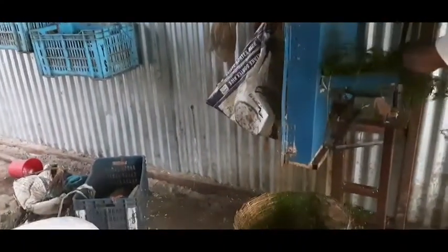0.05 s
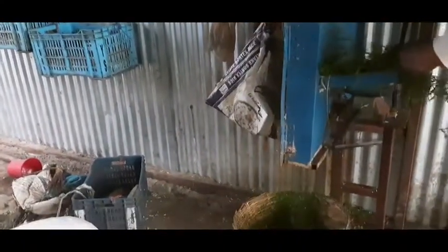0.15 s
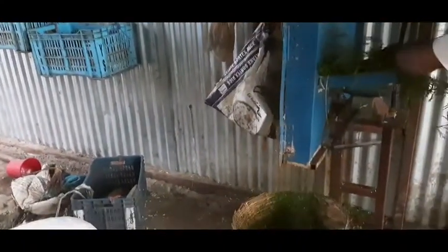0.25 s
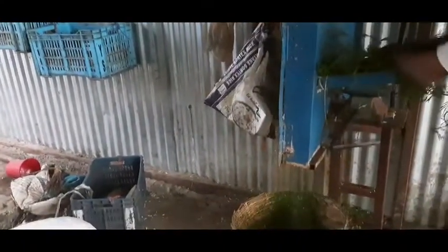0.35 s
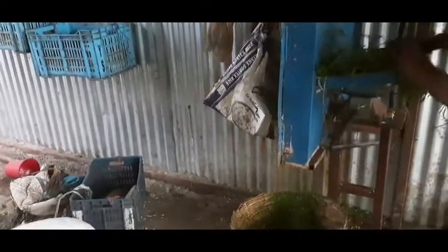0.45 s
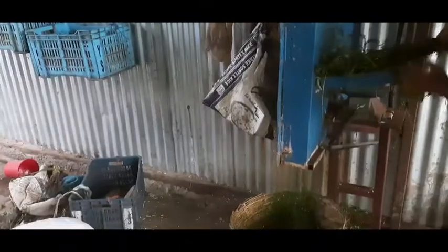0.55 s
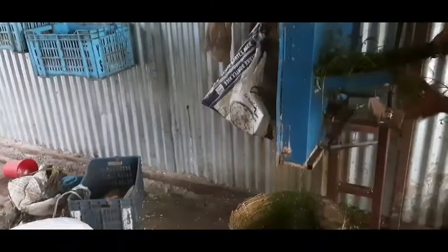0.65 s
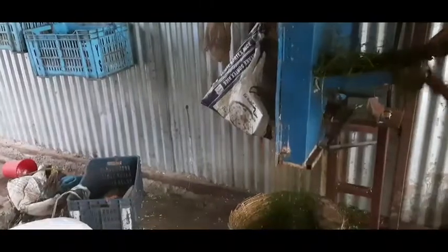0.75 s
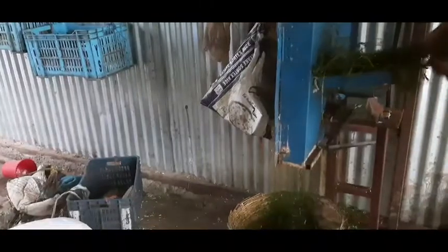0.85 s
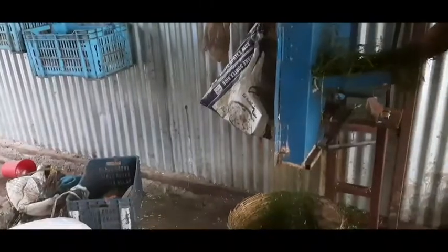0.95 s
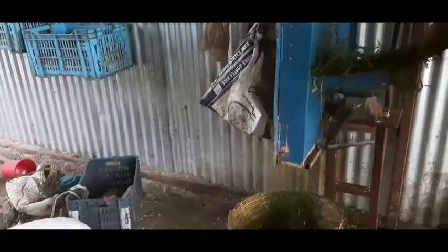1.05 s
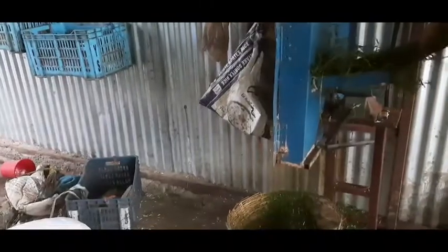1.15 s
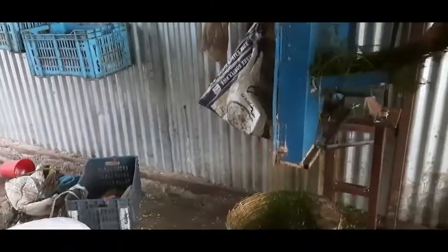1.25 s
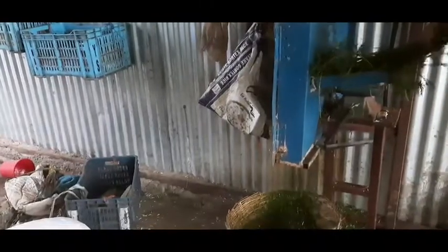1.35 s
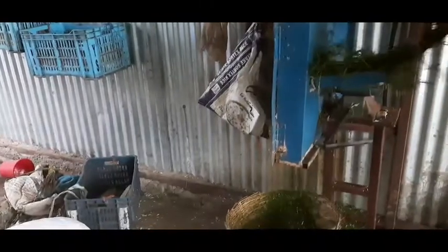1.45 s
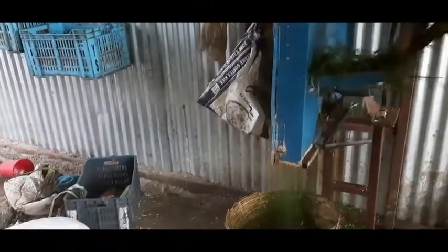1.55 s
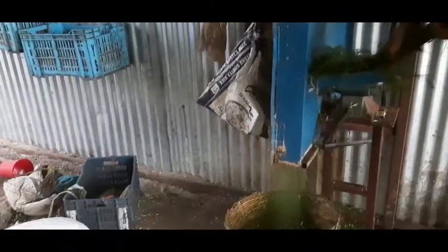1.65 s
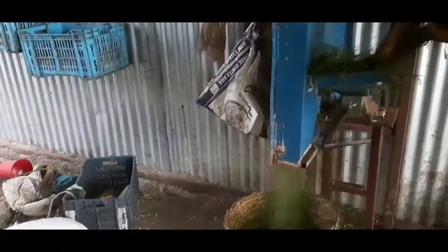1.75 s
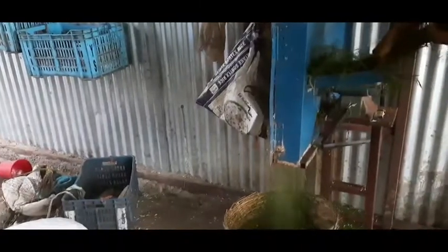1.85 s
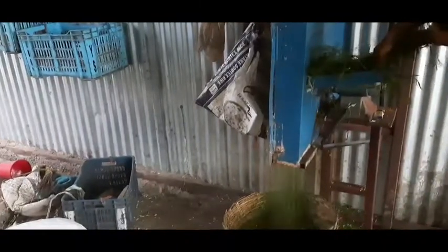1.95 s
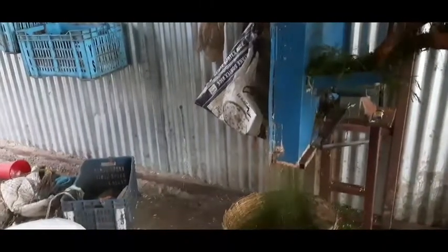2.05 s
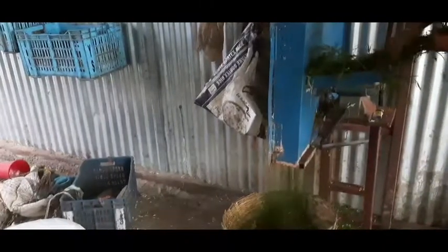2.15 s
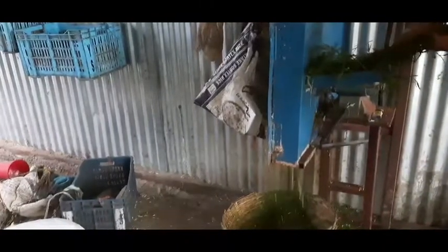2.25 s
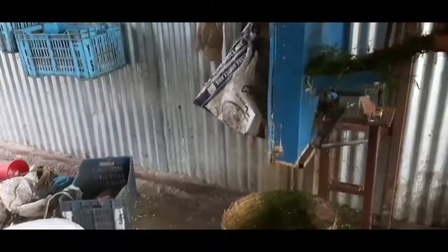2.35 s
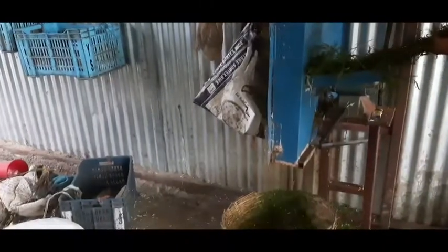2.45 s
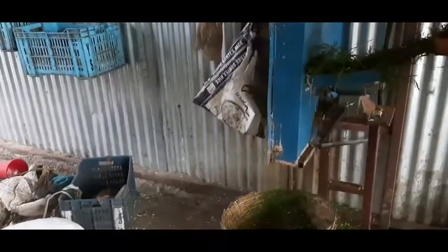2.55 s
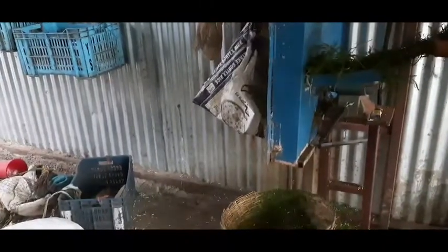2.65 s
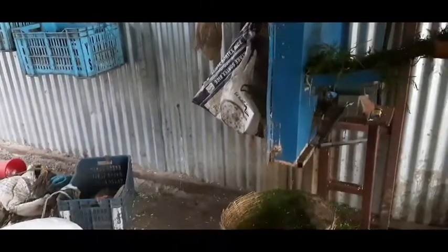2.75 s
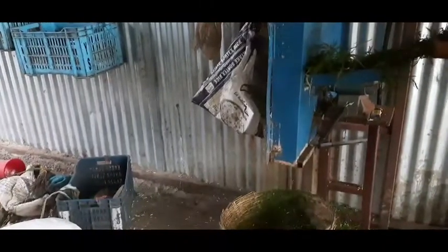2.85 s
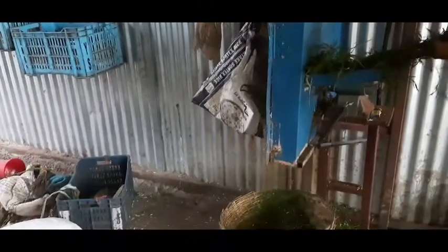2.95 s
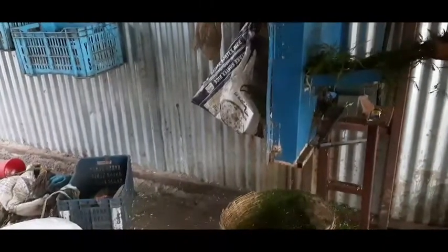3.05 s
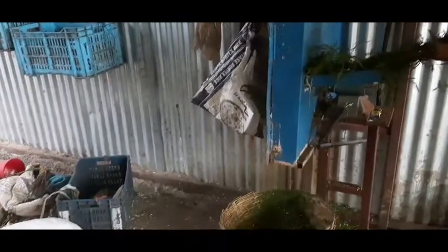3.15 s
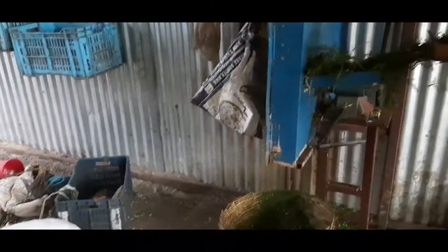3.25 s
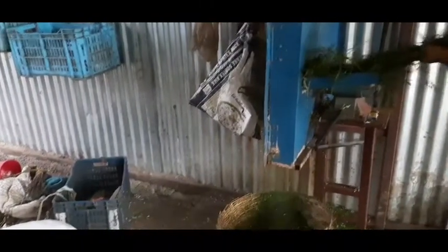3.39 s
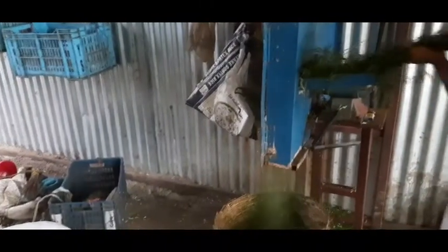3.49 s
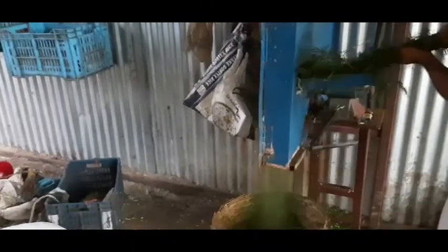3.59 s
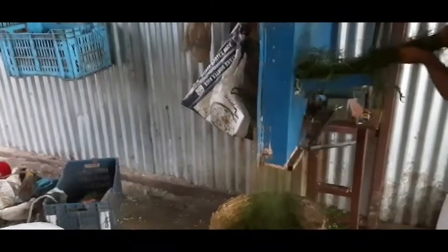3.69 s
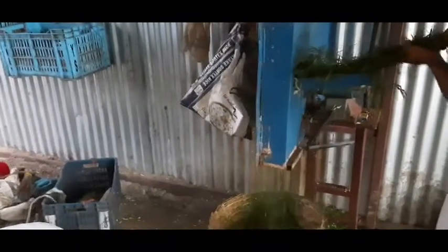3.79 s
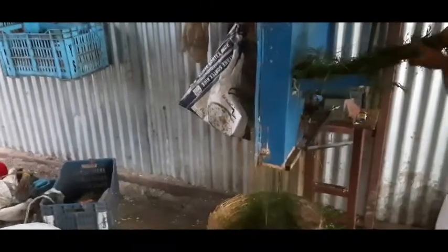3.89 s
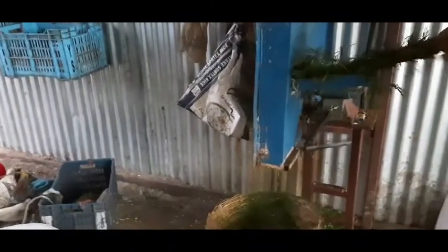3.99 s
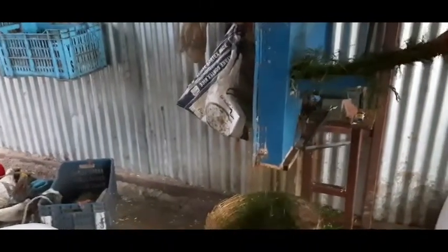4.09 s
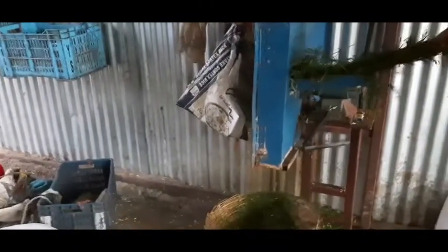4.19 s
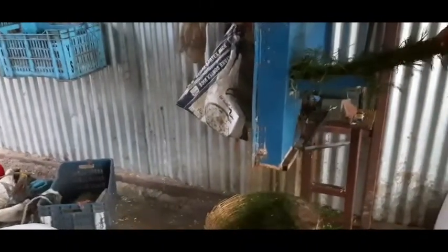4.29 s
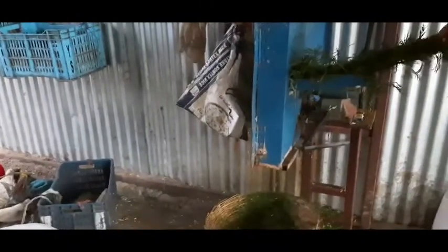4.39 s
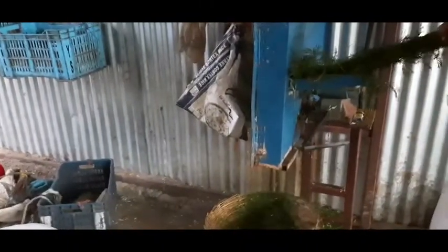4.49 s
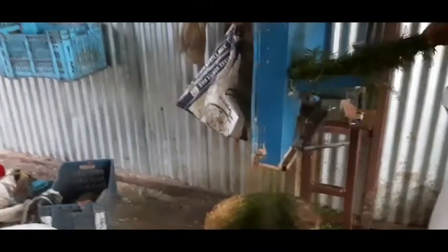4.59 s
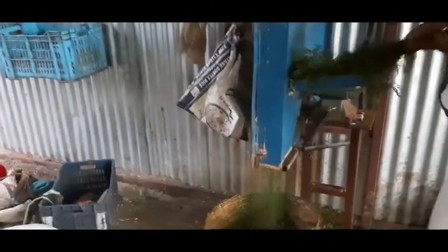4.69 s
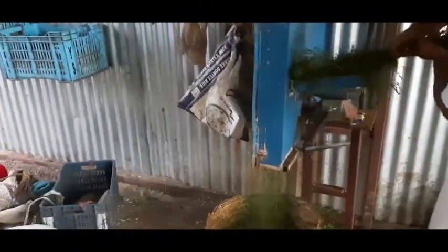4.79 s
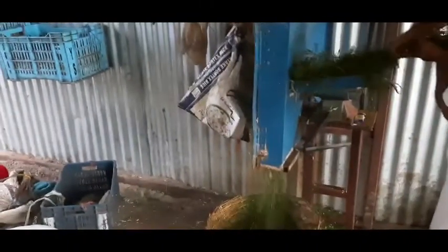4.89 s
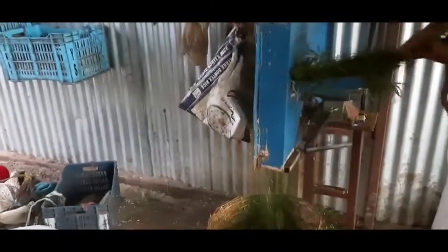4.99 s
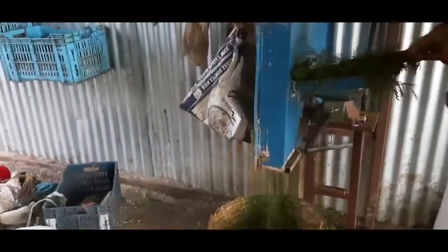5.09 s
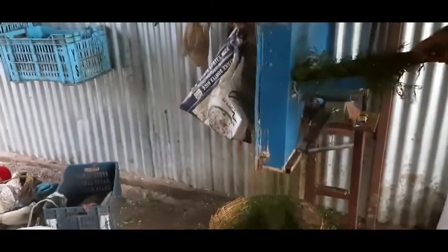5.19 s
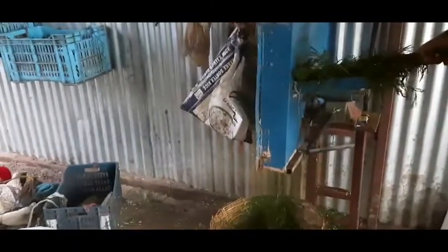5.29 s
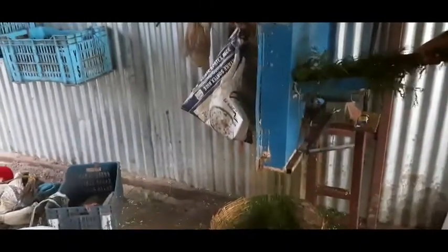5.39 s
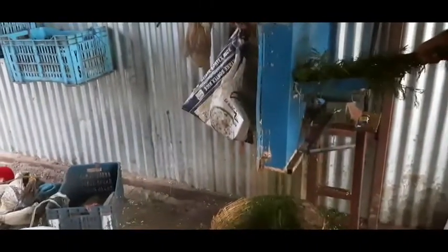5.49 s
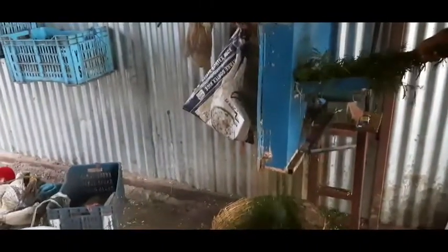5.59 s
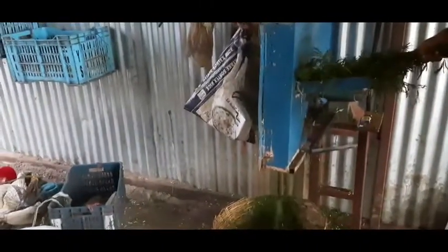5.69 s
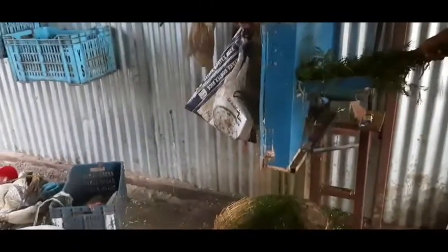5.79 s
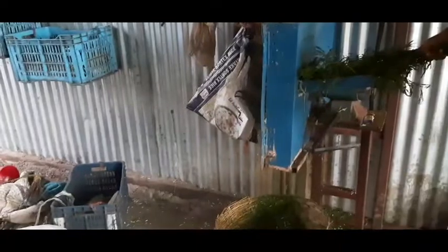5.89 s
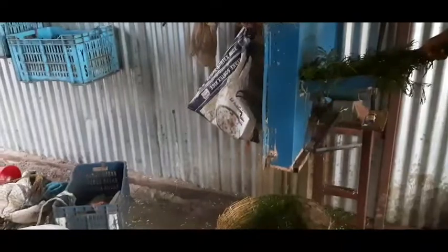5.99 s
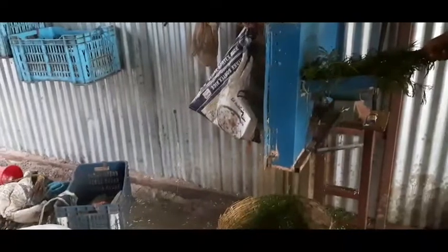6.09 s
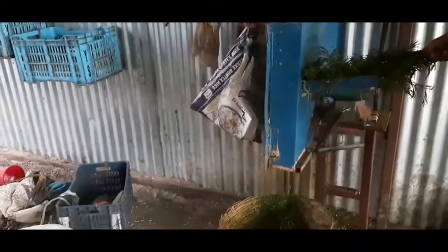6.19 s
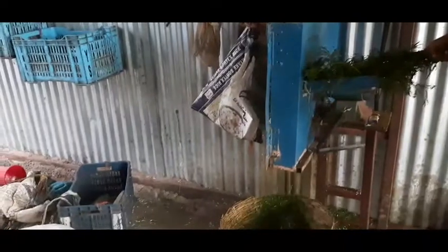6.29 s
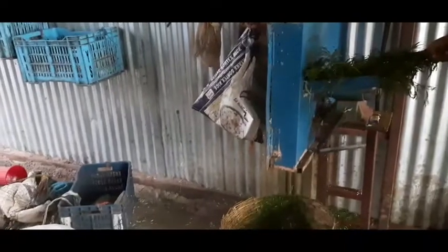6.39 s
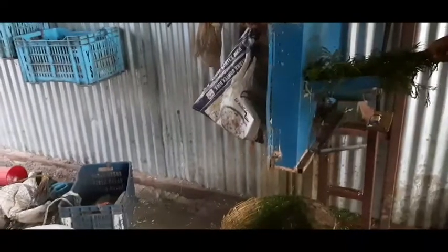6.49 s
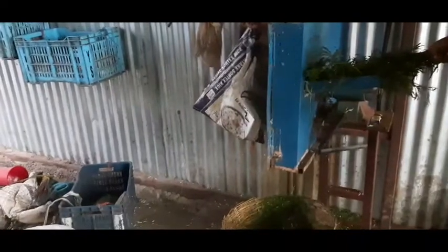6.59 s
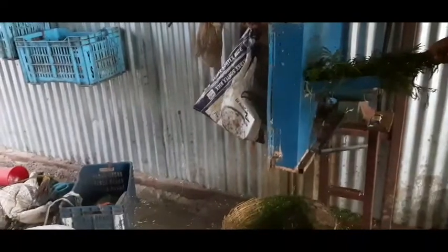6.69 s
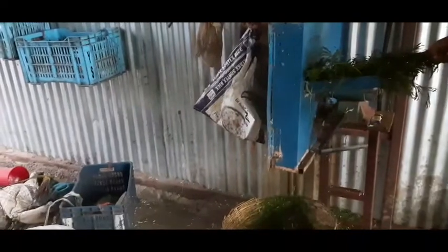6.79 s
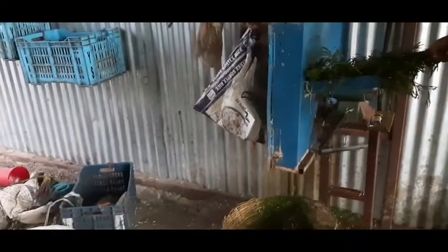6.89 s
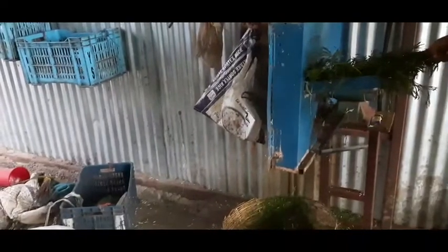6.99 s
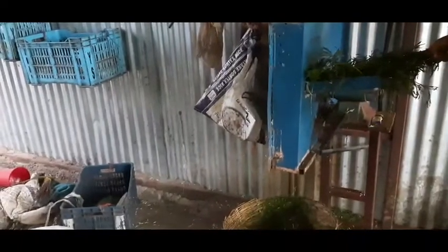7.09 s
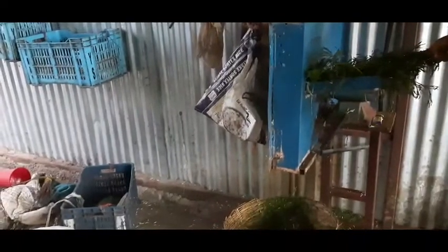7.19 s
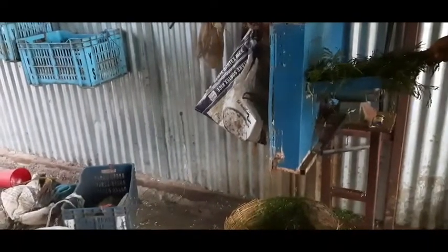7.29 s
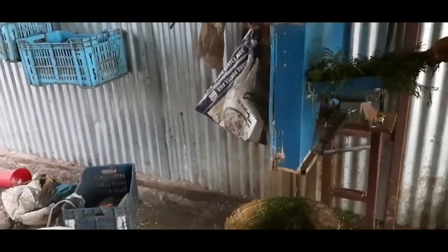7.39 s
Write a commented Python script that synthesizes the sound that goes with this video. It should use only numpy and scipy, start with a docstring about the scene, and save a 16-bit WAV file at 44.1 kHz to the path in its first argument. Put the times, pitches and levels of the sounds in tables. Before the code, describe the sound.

A small two-knife fodder chopper runs close by in a corrugated metal shed. Its buzzing drone carries bursts of wet slashing and casing rattle as fodder is fed. It slows, recovers, slows again, then nearly stalls amid cracking stalks and soft thuds, before winding up clear and alone. Short metallic reverberation; air rumbles lightly on the close stereo microphone, mostly on the right.

```python
"""Fodder chopper in a metal shed

A small two-knife rotor drones as it beats the air in its casing; fodder brakes it and it winds up again.
Knife passes cut noise into bursts of slashing and rattle, and a band of air hiss climbs with the speed.
Stalks crack, clumps thud and a chip ticks; the stand shudders, the shed answers, air buffets the microphone.
Sine waves make drone, thuds and ticks; filtered noise makes most of the rest, resonances the casing."""
import sys
import numpy as np
from scipy import signal
from scipy.fft import rfft, irfft, next_fast_len
from scipy.io import wavfile
from scipy.ndimage import uniform_filter1d

SR = 44100
rng = np.random.default_rng(int(sys.argv[2]) if len(sys.argv) > 2 else 0)


def volts_from_db(level):
    """Convert decibel levels to linear amplitude ratios."""
    exponent = np.asarray(level, float) / 20
    return 10 ** exponent


def unload_wav(signal):
    """Save mono or channel-first audio to the path in sys.argv[1] as 16-bit WAV at rate SR, clipped to [-1, 1]."""
    wavfile.write(
        sys.argv[1],
        SR,
        np.round(np.clip(np.atleast_2d(signal).T, -1, 1) * 32767).astype(np.int16),
    )


N = 328411  # samples


def unit(x):
    """Scales a signal to rms 1."""
    return x / np.sqrt(np.mean(x ** 2) + 1e-20)


def along(points, hz):
    """Reads (Hz, value) points on a log frequency axis."""
    f, v = np.transpose(points)
    return np.interp(np.log(hz + 1), np.log(f + 1), v)


def curves(rows):
    """Gives one value per sample for each column after the time."""
    s, *columns = np.transpose(rows)
    return [np.interp(np.arange(N) / SR, s, column) for column in columns]


def wobble(rate):
    """Draws a random curve with rate knots a second."""
    knots = rng.standard_normal(int(N * rate / SR) + 4)
    return np.interp(np.arange(N) * rate / SR, np.arange(len(knots)), knots)


def filtered(x, response):
    """Multiplies the spectrum of x by a response of frequency, which may be complex."""
    n = x.shape[-1]
    m = next_fast_len(n + SR // 2)
    return irfft(rfft(x, m) * response(np.fft.rfftfreq(m, 1 / SR)), m)[..., :n]


# How alike the two microphone ports hear a sound.
# Each row: frequency in Hz, likeness (1 is the same, 0 or less is unrelated).
PORT_LIKENESS = [(60, 1), (150, 0.97), (380, 0.95), (950, 0.87), (2380, 0.53), (5980, 0.094), (15000, -2.1)]


def alike(two):
    """Mixes two unrelated signals so that the ports agree in the bass and differ in the treble."""
    turn = lambda hz: np.arccos(np.clip(along(PORT_LIKENESS, hz), 0, 1)) / 2
    mid, side = filtered(two, lambda hz: np.array([np.cos(turn(hz)), np.sin(turn(hz))]))
    return np.array([mid + side, mid - side])


def pair():
    """White noise at the two ports."""
    return alike(rng.standard_normal((2, N)))


def swells(start, length, db, rise, fall, wilt=0):
    """Summed power of events that rise, hold (sinking by wilt) and fall, at rates in dB a second."""
    sample = np.arange(0, N + 64, 64)
    t = sample / SR - np.asarray(start)[:, None]
    held = np.asarray(length)[:, None]
    level_db = np.asarray(db)[:, None] - rise * np.maximum(-t, 0)
    level_db = level_db - wilt * np.clip(t, 0, held) - fall * np.maximum(t - held, 0)
    return np.interp(np.arange(N), sample, np.sum(volts_from_db(level_db) ** 2, axis=0))


def patchy(x, depth_db):
    """Gives x slow patches of random gain, so that resonances take turns."""
    z = signal.stft(x, nperseg=256)[2]
    field = rng.standard_normal(z.shape[1:])
    field = uniform_filter1d(uniform_filter1d(field, size=2, axis=0), size=40, axis=1)
    return signal.istft(z * volts_from_db(depth_db * unit(field)), nperseg=256)[1][:, :N]


# How fast the two knives pass. Each row: time in seconds, knife passes a second.
KNIFE_SPEED = [(0, 95.8), (.5, 92.5), (.86, 90.6), (1.01, 90.1), (1.47, 94), (1.62, 89.3), (1.95, 72),
               (2.21, 77.4), (2.73, 86.8), (2.9, 88.1), (3.29, 92.6), (3.4, 87.6), (3.8, 64.5), (4.55, 81),
               (4.75, 65), (5.3, 37.5), (5.6, 32.3), (6.1, 39.7), (7.06, 58.7), (7.45, 66.6)]


def speed():
    """Knife passes a second; the shaft turns at half this rate."""
    return curves(KNIFE_SPEED)[0]


def passes():
    """Knife passes counted since the start."""
    return np.cumsum(speed()) / SR


def riding(x, band, fixed):
    """Noise of steady level whose colour is a band riding on the knife rate times a fixed colour."""
    hz, t, z = signal.stft(x, SR, nperseg=2048)
    knife_rate = np.interp(t, *np.transpose(KNIFE_SPEED))
    gain = volts_from_db(along(band, hz[:, None] / knife_rate)) * fixed(hz)[:, None]
    steady = z * gain / np.sqrt(np.mean(gain ** 2, axis=0))
    return unit(signal.istft(steady, SR, nperseg=2048)[1][:, :N])


# Level at which the running drone is heard. Each row: time in seconds, level in dB.
HEARD_LEVEL = [(0, -38.5), (1.26, -42), (1.46, -40), (2.1, -51.5), (2.5, -47.5), (2.74, -47), (3.1, -45),
               (3.29, -39), (3.9, -54.5), (4.18, -52), (4.3, -52), (4.53, -50.5), (5.1, -50.5),
               (5.5, -62.5), (5.91, -64.5), (6.3, -57), (6.62, -50.5), (6.7, -45.5), (6.98, -42.5),
               (7.11, -38), (7.22, -39), (7.45, -37)]


def heard_db():
    """Heard level of the drone between cuts, in dB."""
    return curves(HEARD_LEVEL)[0]


def uneven():
    """Share of noise in the knife blows, which grows while the rotor is braked and while it crawls."""
    even, jammed = .05, .92  # noise shares at the two ends
    full_braking, settle_s = 46, .12  # passes a second lost each second; time to even out
    crawl_below, crawl_span = 53, 22  # passes a second
    rate = speed()
    braked = np.clip(-np.gradient(rate) * SR / full_braking, 0, 1) ** 2
    keep = np.exp(-1 / (settle_s * SR))
    jam = signal.lfilter([1 - keep], [1, -keep], braked)
    jam = jam + np.clip((crawl_below - rate) / crawl_span, 0, 1)
    return even + (jammed - even) * np.clip(jam, 0, 1)


# Bundles under the knives. Each row: start in seconds, length in seconds, slashing in dB,
# casing drone in dB over the slashing.
FODDER_BUNDLES = [(0, 0.69, -41, -8.5), (0.274, 0.25, -49, 9.5), (0.555, 0.49, -42, 5),
                  (1.08, 0.084, -50, 6.5), (1.486, 0.39, -36, -1.5), (2, 0.12, -45.5, -3.5),
                  (2.226, 0.65, -53.5, -12), (2.811, 0.13, -51.5, 7), (3.033, 0.37, -53.5, -37),
                  (3.331, 0.3, -37.5, 1), (4.593, 0.058, -42, 1), (4.611, 0.28, -39, 2),
                  (5.25, 0.063, -53, -0.5), (5.577, 0.04, -72.5, 2), (5.673, 0.047, -58.5, 0)]
# Thick spots in the fodder. Each row: time in seconds, slashing in dB, casing drone in dB over the slashing.
FODDER_LUMPS = [(0.092, -38.5, -25), (.44, -36.5, -35), (.64, -39.5, -13), (.82, -36, -4),
                (.95, -33.5, -10), (1.319, -46.5, -11), (1.58, -52, 18), (1.88, -47, 12.5), (2.9, -44, -24),
                (3.42, -41.5, 6.5), (3.6, -48, 15), (3.685, -54.5, 13), (4.695, -38.5, 5), (4.77, -42, 8.5),
                (4.85, -58, 8), (5.15, -54, 8)]


def load(idle_db, share, extra_db=0, wilt=0):
    """Gain of a layer: level between cuts plus what fodder adds; share 0 follows slashing, 1 the drone."""
    s, length, db, over_db = np.transpose(FODDER_BUNDLES)
    fed = swells(s, length, db + share * over_db, 520, 134, wilt)
    s, db, over_db = np.transpose(FODDER_LUMPS)
    fed = fed + swells(s, 0 * s, db + share * over_db, 185, 190)
    return np.sqrt(volts_from_db(heard_db() + idle_db) ** 2 + volts_from_db(extra_db) ** 2 * fed)


def biting():
    """Share 0-1 of the beat that comes from knives in fodder; it follows the load with a lag."""
    takes, lingers_s = 2.6, .11  # how soon fodder brings the bite in; how long it stays
    fed = 1 - (volts_from_db(heard_db()) / load(0, 0.51)) ** 2
    keep = np.exp(-1 / (lingers_s * SR))
    smooth = signal.lfilter([1 - keep], [1, -keep], fed, zi=[fed[0]])[0]
    return np.clip(takes * smooth, 0, 1)


# Resonances of the sheet-metal casing. Each row: frequency in Hz, width in Hz, level in dB.
CASING_MODES = [(174.7, 19.1, -9.5), (259.3, 24.8, -4.5), (367.3, 41, 2.5), (461.7, 56, -1), (678, 53.4, 0),
                (867, 66, -6), (1005, 47, -7.5), (1539, 88, -9.5), (1845, 97, -12.5), (2497, 64, -12)]


def casing(f):
    """Causal response of the casing: a sum of resonances with alternating signs."""
    return sum((-1) ** k * volts_from_db(db) * 1j * f * width / (hz * hz - f * f + 1j * f * width)
               for k, (hz, width, db) in enumerate(CASING_MODES))


# Colour of cut stalks. Each row: frequency in Hz, relative level in dB per Hz.
CUT_COLOUR = [(1060, -21.5), (1800, -9), (2000, -15.5), (2480, -12.5), (3110, -13.5), (4330, -12),
              (9520, -16), (12600, -13.5), (15300, -17.5)]


def cut_colour(hz):
    """Loudness of tearing stalks at each frequency."""
    return volts_from_db(along(CUT_COLOUR, hz))


# How long the shed rings. Each row: frequency in Hz, time to fall by 60 dB in seconds.
SHED_DECAY = [(200, 0.24), (1000, 0.47), (4000, 0.45), (12000, 0.095)]


def shed(x):
    """The walls' answer: a tail of noise in which each frequency dies at its own speed."""
    hz, t, z = signal.stft(alike(rng.standard_normal((2, SR // 2))), SR, nperseg=256)
    dying = z * volts_from_db(-60 * t / along(SHED_DECAY, hz)[:, None])
    tail = signal.istft(dying, SR, nperseg=256)[1]
    return signal.fftconvolve(x, tail / np.linalg.norm(tail[0]), axes=1)[:, :N]


# Colour of the wind rumble. Each row: frequency in Hz, relative level in dB per Hz.
PUFF_COLOUR = [(20, -33), (50, -2), (75, 4), (120, 0), (260, -24)]
# Puffs of air on the ports. Each row: start in seconds, length in seconds, level in dB before the port gains.
AIR_PUFFS = [(1.633, 0.16, -49), (3.408, 0.12, -47.5), (4.657, 0.37, -64.5)]


def buffeting(left_db=-2, right_db=9):
    """Air thrown from the chute rumbles on each port apart, most on the right."""
    rumble = filtered(rng.standard_normal((2, N)), lambda hz: volts_from_db(along(PUFF_COLOUR, hz)))
    lumps = volts_from_db(2.2 * np.array([wobble(10), wobble(25)]))
    gust_power = swells(*np.transpose(AIR_PUFFS), 350, 250)
    draught = volts_from_db(-57 + 0.58 * heard_db())  # follows the heard level in part
    return np.sqrt(gust_power + draught ** 2) * volts_from_db([[left_db], [right_db]]) * unit(rumble * lumps)


# Colour of the shuddering stand. Each row: frequency in Hz, relative level in dB per Hz.
STAND_COLOUR = [(35, -38), (70, 3.5), (130, -5), (230, -4.5), (400, -27)]


def shudder():
    """Uneven blows shake the stand in a low rumble."""
    rumble = unit(filtered(pair(), lambda hz: volts_from_db(along(STAND_COLOUR, hz))))
    shaking = np.sqrt(0.05 + uneven())  # a little is left while blows are even
    return volts_from_db(-15) * load(0, 0.3) * shaking * rumble


# Air whipped by the knife tips. Each row: multiple of the knife rate, relative level in dB per Hz.
WHIPPED_AIR = [(10, -37), (20, -15), (35, -3), (43, 5.5), (53, 4), (59, -5.5), (67, -19), (100, -40),
               (200, -59)]
# The housing this air leaves by. Each row: frequency in Hz, gain in dB.
VENT_COLOUR = [(1000, 17.5), (1250, -28), (1550, 2), (2050, 0), (2350, -0.5), (2630, 1), (2950, -3),
               (3300, -7.5), (6000, -1)]


def whipping(rasp_db=7):
    """A band of air noise whose edges climb with the rotor, rasping once a knife pass."""
    fades_below, fade_db = 54.3, 1.24  # passes a second; dB lost for each one under it
    level_db = -23 + 0.74 * heard_db()  # follows the heard level in part
    level_db = level_db - fade_db * np.maximum(fades_below - speed(), 0)
    rasp = unit(volts_from_db(-rasp_db * (passes() % 1)))
    air = riding(pair(), WHIPPED_AIR, lambda hz: volts_from_db(along(VENT_COLOUR, hz)))
    return volts_from_db(level_db + 1.5 * wobble(15)) * rasp * air


# A loose chip ticks a knife. Each row: time in seconds, level in dB.
CHIP_TICKS = [(.93, -45), (1.041, -43.5), (1.49, -37), (5.235, -57), (5.715, -57)]
# Ringing of the knife. Each row: frequency in Hz, level in dB, time to fall by 60 dB in seconds.
KNIFE_MODES = [(2400, -2.5, 0.16), (3660, 1, 0.11), (5820, 5, 0.17), (6440, -2, .08), (7160, -4, .08)]


def ticks():
    """Short ringing of a knife: dying sine waves with unsteady phase."""
    out, t = np.zeros(N + SR), np.arange(SR // 4) / SR
    for s, db in CHIP_TICKS:
        for hz, mode_db, t60 in KNIFE_MODES:
            fade = volts_from_db(mode_db + rng.normal(0, 2) - 60 * t / t60)
            drift = np.cumsum(rng.normal(0, .06, len(t)))  # radians
            out[round(s * SR):][:len(t)] += volts_from_db(db) * fade * np.sin(2 * np.pi * hz * t + drift)
    return out[:N]


# Clumps that tumble in the slowing casing. Each row: time in seconds, level in dB, pitch in Hz.
CLUMP_THUDS = [(4.801, -26.5, 222), (4.861, -31, 200), (4.911, -30, 171), (4.949, -27, 197),
               (5.05, -34.5, 176), (5.142, -51, 326.5), (5.245, -52, 220), (5.35, -57, 188)]


def thuds(rise_s=0.011, t60_s=0.074):
    """Soft low blows of wet fodder on the casing wall: short sine waves with a rounded start."""
    out, t = np.zeros(N + SR), np.arange(SR // 4) / SR
    for s, db, hz in CLUMP_THUDS:
        swell = volts_from_db(db - 60 * t / t60_s) * (1 - np.exp(-t / rise_s))
        out[round(s * SR):][:len(t)] += swell * np.sin(2 * np.pi * hz * t)
    return out[:N]


# Single stalks struck. Each row: time in seconds, crack level in dB, knock in dB over the crack.
STRUCK_STALKS = [(1.479, -34, -1), (1.995, -48, -8), (2.17, -39, -9), (3.3005, -33, -16), (4.078, -61, -9),
                 (4.5474, -45, -8), (4.572, -37.5, 9.5), (4.87, -37, 18), (5.127, -45.5, 12),
                 (5.232, -31.5, 4.5), (5.6565, -38.5, 4.5)]


def stalks(crack_s=0.045, tail_s=0.24, tail_db=-8, push_db=19, soft_hz=1100):
    """A stiff stalk cracks, scatters chips and knocks the casing: one hard push, then tumbling."""
    shape, tumbling, push = np.zeros(N + SR), np.zeros(N + SR), np.zeros(N)
    t = np.arange(SR // 2) / SR
    for s, db, knock_db in STRUCK_STALKS:
        i = round(s * SR)
        shape[i:][:len(t)] += volts_from_db(db - 5.5) * (volts_from_db(-60 * t / crack_s) + volts_from_db(tail_db - 60 * t / tail_s))
        tumbling[i:][:len(t)] += volts_from_db(db + knock_db + 8.5 - 60 * t / 0.19)
        push[i] = volts_from_db(db + knock_db + push_db)
    crack = unit(filtered(pair(), cut_colour)) * shape[:N]
    soft_casing = lambda hz: casing(hz) / (1 + 1j * hz / soft_hz) ** 2
    return crack + filtered(pair() * tumbling[:N] + push, soft_casing)


def slashing(fall_db=5, knee_hz=950, broad=0.079):
    """Each knife pass tears a burst of hiss (sudden start, quick fall, new size) and rattles the casing."""
    count, rate, share = passes(), speed(), uneven()
    which = count.astype(int)
    size_db = 1.6 * rng.standard_normal(which[-1] + 1)
    burst = volts_from_db(size_db[which] - fall_db * (count - which) + wobble(16))
    # sap and fibres snap in grains of 16 samples
    crackle = volts_from_db(1.2 * rng.standard_normal(N // 16 + 1).repeat(16)[:N])
    hiss = unit(filtered(pair() * burst * crackle, cut_colour))

    ringing = lambda hz: np.abs(casing(hz)) + broad
    upper = lambda hz: ringing(hz) / (1 + (knee_hz / (hz + 1)) ** 4) / (1 + (hz / 2800) ** 4)
    muffled = lambda hz: upper(hz) / ringing(hz) ** .45  # packed fodder damps the ringing
    # one knife strikes harder, in tune with the shaft
    taps = burst * np.diff(which, prepend=0) * volts_from_db(-9 * (which % 2))
    # each blow tears on through the turn
    blow = alike(rng.standard_normal((2, 900)) * volts_from_db(-np.arange(900) / 90))
    taps = unit(filtered(signal.fftconvolve(taps[None], blow, axes=1)[:, :N], upper))
    shaken = np.sqrt(1 - share) * unit(filtered(pair() * burst, upper))
    shaken = shaken + np.sqrt(share) * unit(filtered(pair() * burst, muffled))
    loose = np.clip(.35 + share + (90 - rate) / 40, 0, 1)  # share of shaking against clean taps
    rattle = unit(patchy(np.sqrt(loose) * shaken + np.sqrt(1 - loose) * taps, depth_db=1.3))
    # the hiss thins by 1 dB a second as a bundle is eaten; the rattle lies between slashing and drone
    return load(-18.5, 0, wilt=1) * hiss + load(-19.5, 0.7, -3.5) * rattle


# Beat of the rotor on the air; even orders are knife passes.
# Each number: relative level in dB of shaft orders 2, 3, 4 and so on.
AIR_BEAT = [14, 9, 2, -2.5, -0.5, -7.5, 0.5, -14, -4, -17.5, -4, -17, -5.5, -25, -5, -19, -4.5, -25, -7,
            -22, -10.5, -14, -15, -27, -14]
# Beat with stalks in the mouth: one knife bites harder, so odd orders stand out.
# Each number: relative level in dB of shaft orders 2, 3, 4 and so on.
BITE_BEAT = [-2, 1, 5, -14, 0, -19, -6.5, -4, -3.5, -17.5, -4, -9.5, -3, -16, -4.5, -18, -9, -6, -7.5, -35,
             -15, -4, -20, -15, -13]
# Colour of the roar; a slower rotor roars duller.
# Each row: multiple of the knife rate, relative level in dB per Hz.
ROAR_COLOUR = [(1, 4.5), (7, -1.5), (12, -5), (30, -33.5)]


def drone(gate=0.26, knee_hz=165):
    """Shaft orders through the casing; uneven blows turn them into a roar throbbing with the knives."""
    shaft_hz, count, grid_hz = speed() / 2, passes(), np.arange(2000)
    bass = lambda hz: 1 / (1 + (knee_hz / (hz + 1)) ** 2)  # the small casing radiates little bass
    radiated = np.abs(casing(grid_hz)) * bass(grid_hz)
    slowed = 46 - shaft_hz  # a slower beat is rounder: its high orders sink
    bite = biting()
    lines, power = 0, 0
    for k, (db, bite_db) in enumerate(zip(AIR_BEAT, BITE_BEAT), start=2):
        order_db = db + bite * (bite_db - db) + 2.8 * wobble(5) - .055 * k * slowed
        level = volts_from_db(order_db) * np.interp(k * shaft_hz, grid_hz, radiated)
        lines = lines + level * np.sin(2 * np.pi * (k * count / 2 + rng.random()))
        power = power + level ** 2
    lines = unit(lines / np.sqrt(power))
    throb = pair() * (1 + gate * np.cos(2 * np.pi * count))
    roar = riding(throb, ROAR_COLOUR, lambda hz: np.abs(casing(hz)) ** 0.83 * bass(hz))
    share = uneven()
    return load(0, 1.0) * (np.sqrt(1 - share) * lines + np.sqrt(share) * roar)


def scene():
    """The chopper, the shed's answer and the buffeting."""
    chopper = shudder() + whipping() + ticks() + thuds() + stalks() + slashing() + drone()
    return chopper + volts_from_db(-7.5) * shed(chopper) + buffeting()


def low_pass(x):
    """Removes everything above the highest recorded frequency."""
    return signal.sosfilt(signal.butter(12, 16720, fs=SR, output="sos"), x)


# Balance of the two ports. Each row: frequency in Hz, left over right in dB.
PORT_BALANCE = [(150, -0.5), (500, -1), (1500, -1), (3000, 1), (5000, -5.5), (9000, -4.5), (14000, 1.5)]


def record(dry):
    """Two ports a little apart, each with its own colour, under one band limit."""
    lag, top_hz = 4, 15750  # samples by which the left port hears later; band limit
    side = np.array([[.5], [-.5]])
    colour = lambda hz: volts_from_db(side * along(PORT_BALANCE, hz))
    delay = lambda hz: np.exp(-2j * np.pi * hz * side * lag / SR)
    mix = filtered(dry, lambda hz: colour(hz) * delay(hz) * (hz < top_hz))
    return low_pass(mix)


dry = scene()
out = record(dry)
unload_wav(out)
```